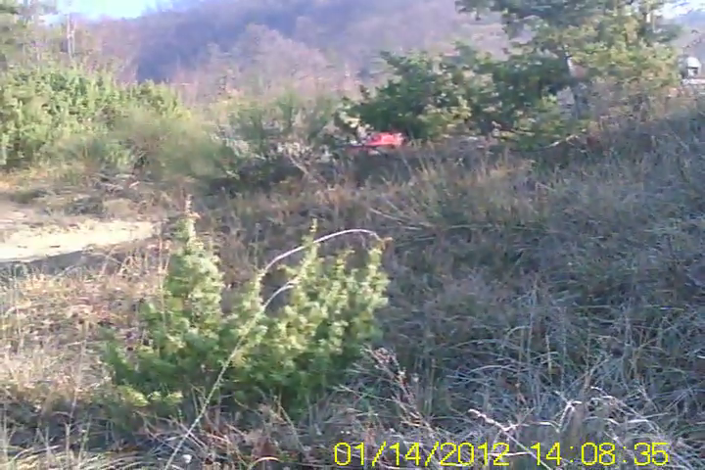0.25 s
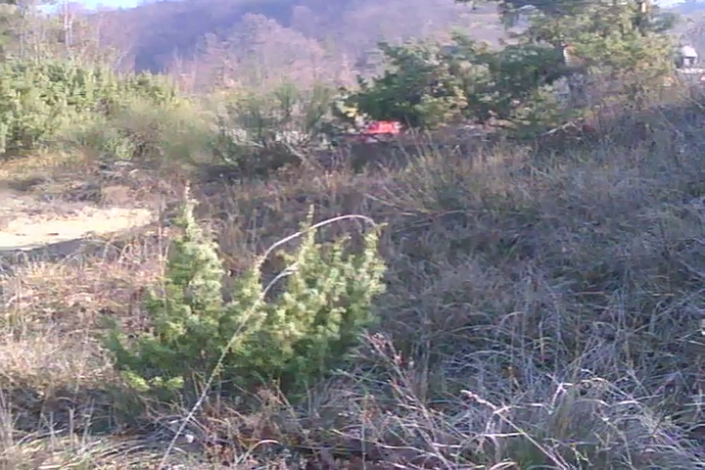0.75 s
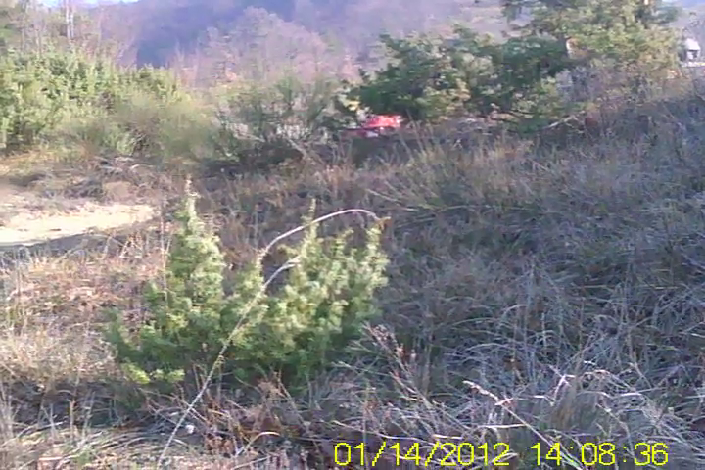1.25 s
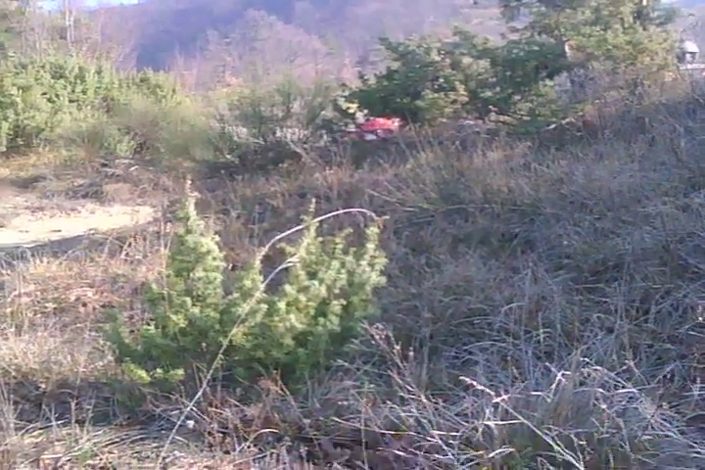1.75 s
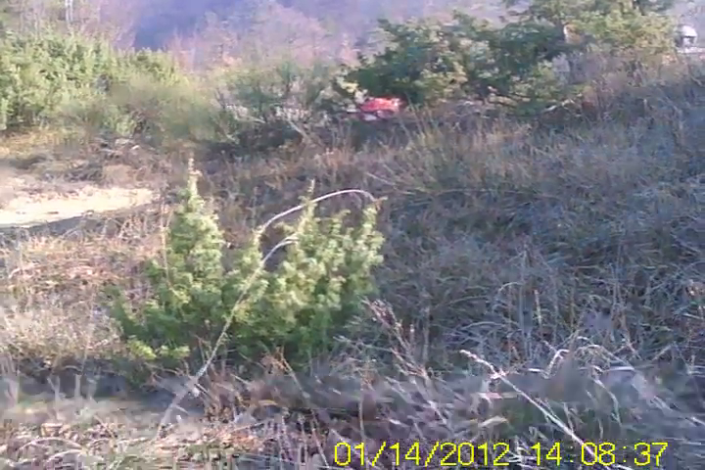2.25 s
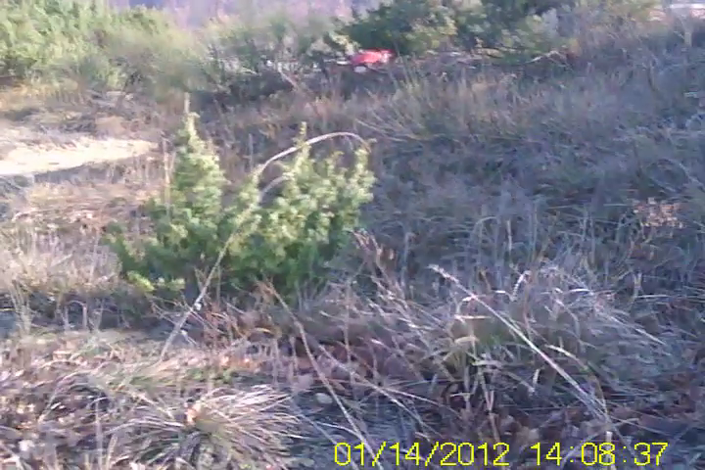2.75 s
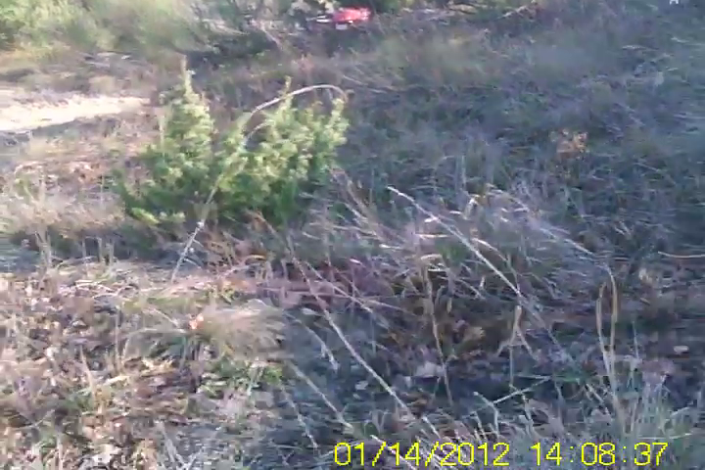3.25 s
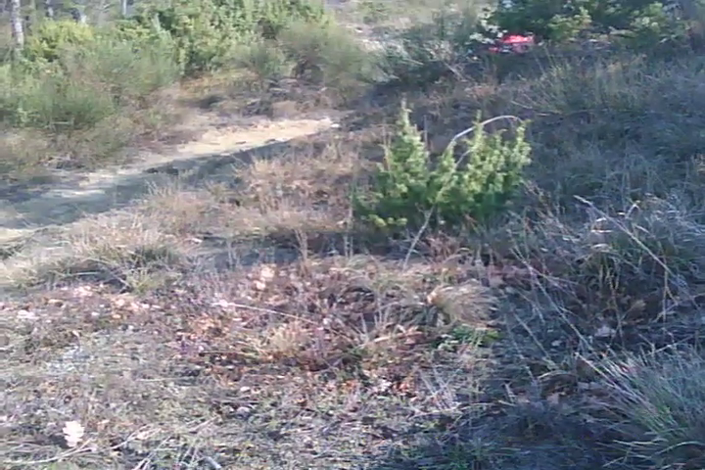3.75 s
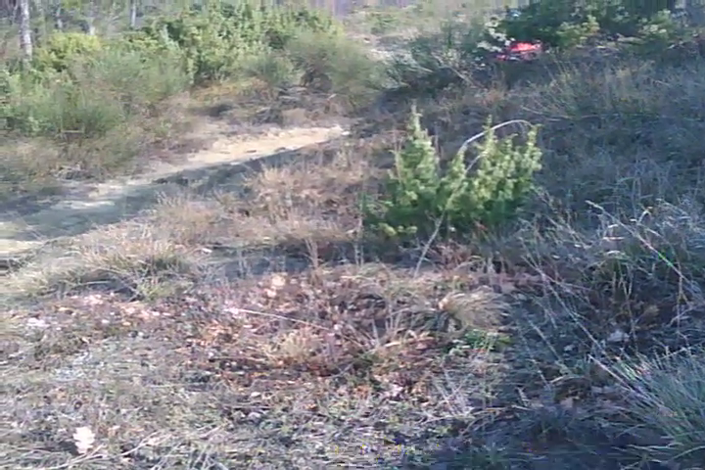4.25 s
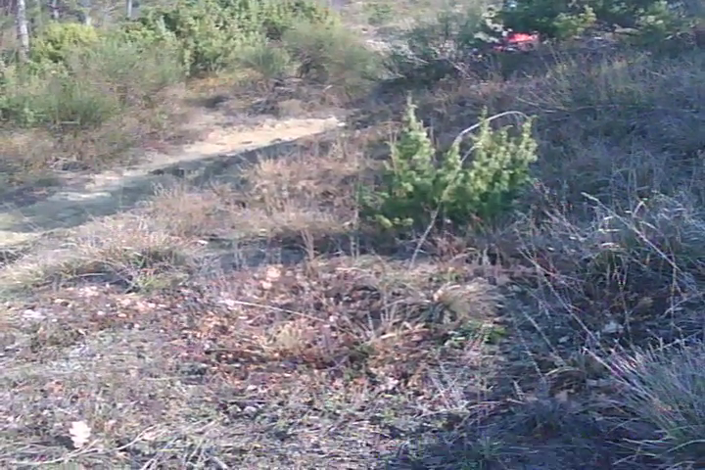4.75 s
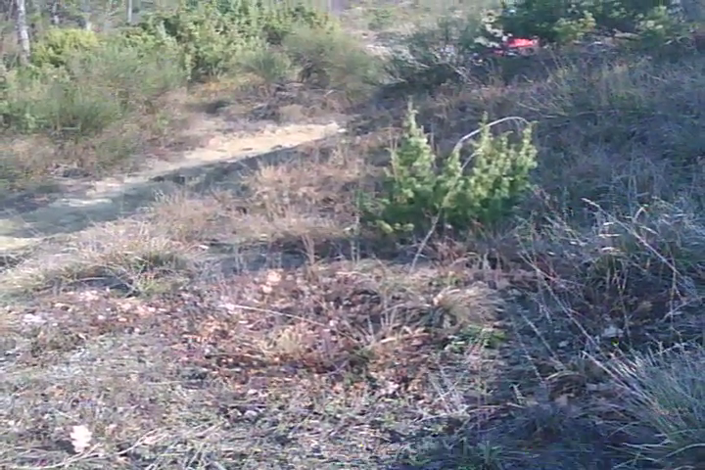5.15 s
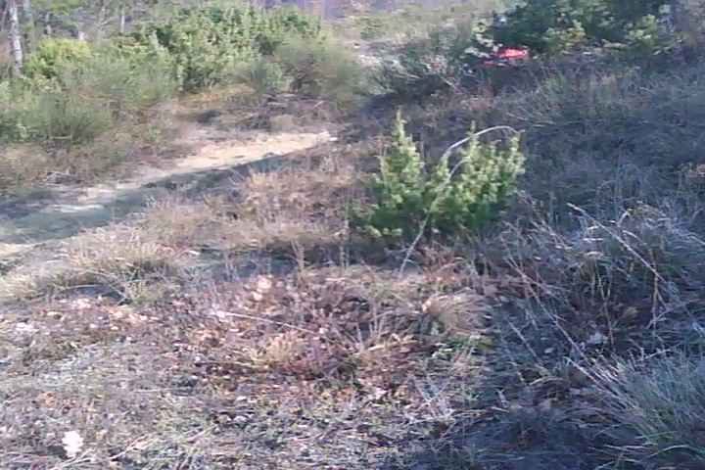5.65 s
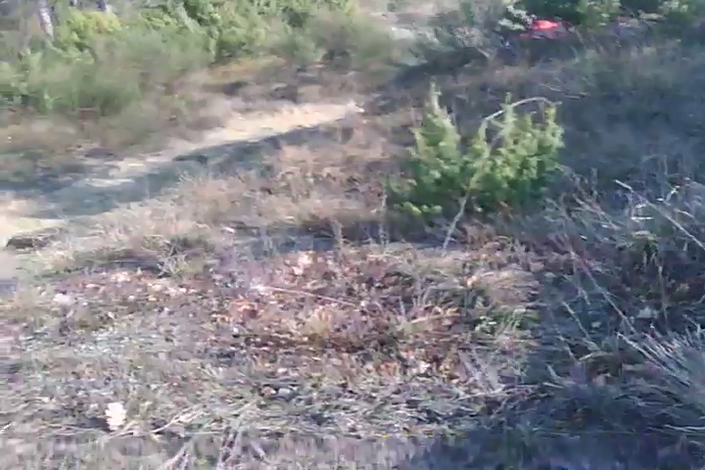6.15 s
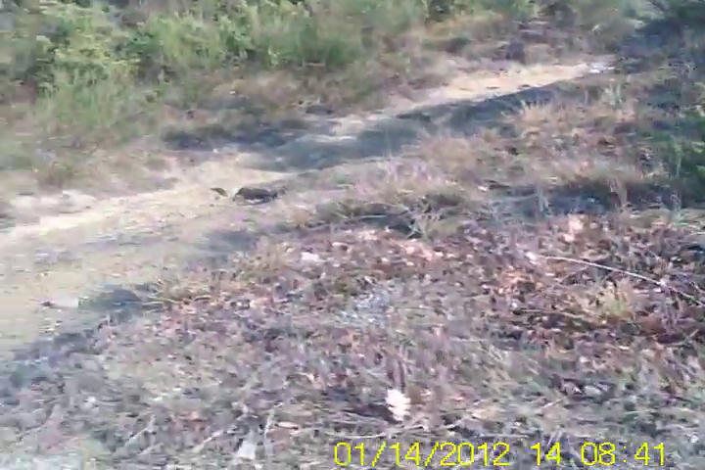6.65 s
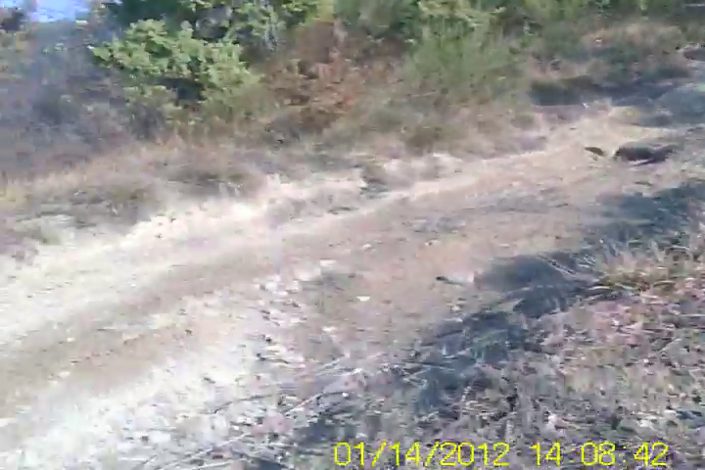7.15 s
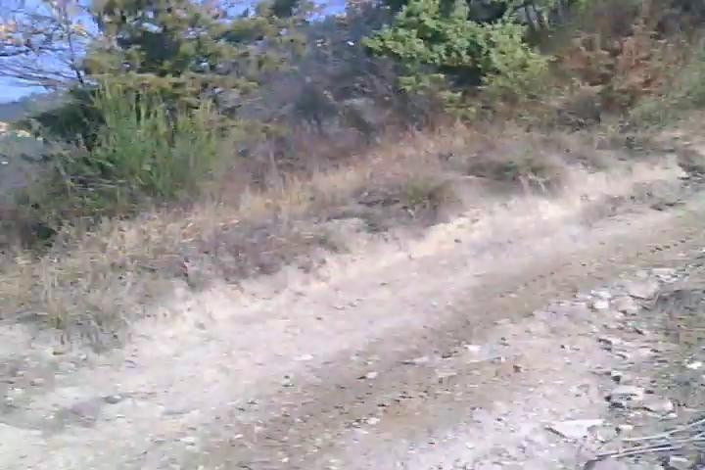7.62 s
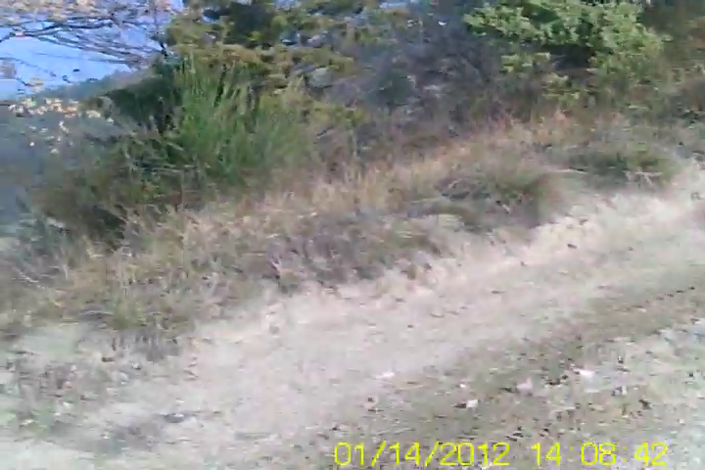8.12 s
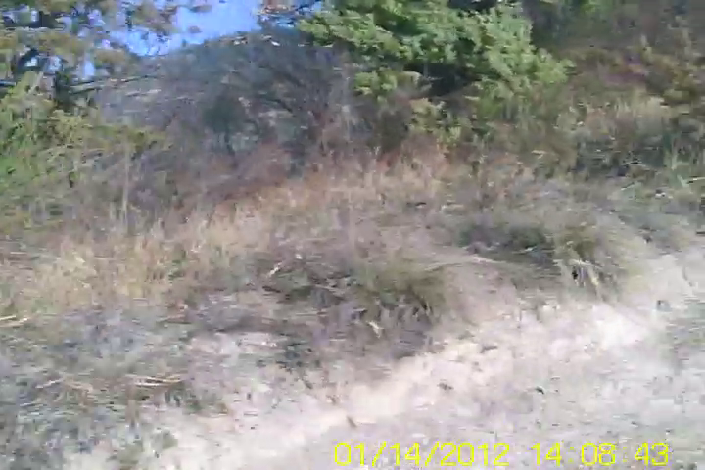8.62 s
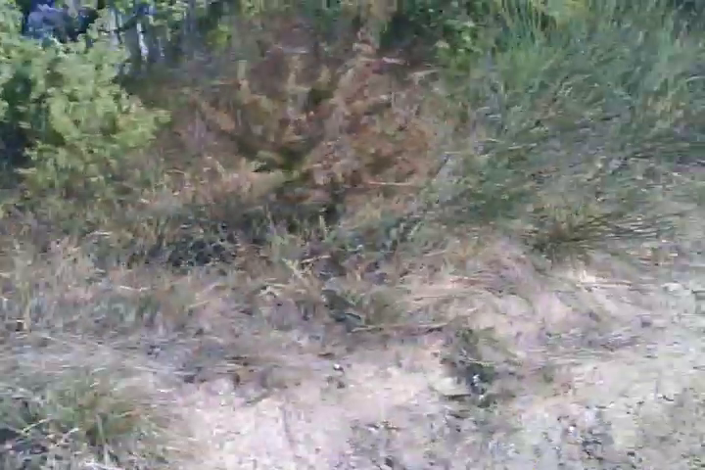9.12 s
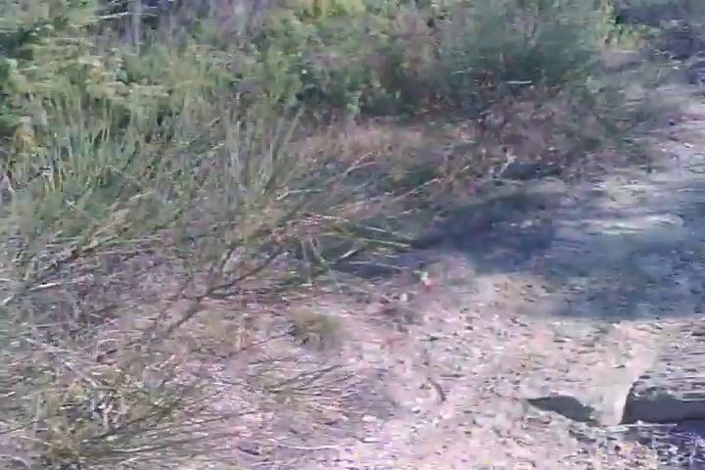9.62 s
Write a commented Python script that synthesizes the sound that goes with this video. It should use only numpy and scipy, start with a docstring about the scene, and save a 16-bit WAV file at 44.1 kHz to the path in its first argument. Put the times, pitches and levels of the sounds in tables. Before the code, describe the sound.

From the rider's seat outdoors on a hillside trail, a single-cylinder quad bike idles in slow soft puffs with light casing clatter. Two hard gear clunks come early, then one short rev with a brief gear whine and drive rattle as it falls. It idles again, knocks lightly, then accelerates into a growling roar with clanking bodywork and rumbling ground, before easing off at the end.

```python
"""A single-cylinder quad bike idles on a rough trail, heard from the rider's seat. It clunks into gear,
is revved once, idles again, then pulls away hard and rolls off. Idle is soft exhaust puffs and intake gulps;
under load sharp pulses ring the silencer, gas rushes out and sine orders of the firing rate swell.
Noise shaken in step with the crank rings the casing and rattles the slack drive; gears whine once.
Knocks ring gearbox and frame, controls tick, bodywork clanks, the ground rumbles; the loudest peaks clip."""
import sys
import numpy as np
from scipy import signal
from scipy.fft import rfft, irfft
from scipy.io import wavfile
from scipy.ndimage import uniform_filter1d

SR = 44100
rng = np.random.default_rng(int(sys.argv[2]) if len(sys.argv) > 2 else 0)


def dump(signal):
    """Clip the signal to [-1, 1] and save it as 16-bit WAV at the path in sys.argv[1]."""
    limited = np.clip(np.atleast_2d(signal).T, -1, 1)
    pcm = np.round(limited * 32767).astype(np.int16)
    wavfile.write(sys.argv[1], SR, pcm)


N = 435708
T = np.arange(N) / SR  # time [s]


def gain_of(db):
    """Decibels to amplitude."""
    return 10 ** (np.asarray(db) / 20)


def evened(x):
    """Scales to rms 1."""
    return x / np.sqrt(np.mean(x ** 2) + 1e-20)


def steadied(x, size):
    """Scales to about rms 1 over a sliding window of samples, leaving faster throbs alone."""
    power = uniform_filter1d(uniform_filter1d(x ** 2, size), size)
    return x / np.sqrt(abs(power) + 1e-12)


def curve(rows):
    """The second column of a table, joined by straight lines in time."""
    times, values = np.transpose(rows)
    return np.interp(T, times, values)


def wander(hz):
    """Slow random motion of rms 1, falling away above the given rate."""
    rolloff = 1 + (np.fft.rfftfreq(N, 1 / SR) / hz) ** 4
    return evened(irfft(rfft(rng.standard_normal(N)) / rolloff, N))


def coloured(x, points):
    """Minimum-phase filter through the given points (frequency [Hz], gain [dB])."""
    hz, db = np.transpose(points)
    bins = abs(np.fft.fftfreq(8192, 1 / SR)) + 1
    log_gain = np.log(gain_of(np.interp(np.log(bins), np.log(hz), db)))
    taps = np.fft.ifft(np.exp(np.conj(signal.hilbert(log_gain)))).real[:4096]
    return signal.oaconvolve(x, taps)[:len(x)]


def ring(x, modes):
    """Parallel resonances (frequency [Hz], width [Hz], level [dB]), each of gain 1 before its level."""
    return sum(gain_of(db) * signal.lfilter(*signal.iirpeak(hz, hz / width, SR), x)
               for hz, width, db in modes)


def lobe(cycle, angle, width):
    """A smooth bump once a cycle; angle and width are shares of the cycle."""
    distance = (cycle - angle + .5) % 1 - .5
    return np.exp(-.5 * (distance / width) ** 2)


def strokes(cycle, angle, scatter, spread_db):
    """One impulse a cycle, a little uneven in timing and strength."""
    turn = np.arange(int(cycle[-1]) + 1)
    shift, strength = rng.standard_normal((len(turn), 2)).T
    at = np.searchsorted(cycle, turn + angle + scatter * shift)
    gain = gain_of(spread_db * np.minimum(strength, 1.5))
    return np.bincount(at, gain * (at > 0), N + 1)[:N]


def impulses(rows):
    """Impulses at the times and levels of an event table."""
    at = [round(row[0] * SR) for row in rows]
    return np.bincount(at, [gain_of(row[1]) for row in rows], N)[:N]


def burst(hits, decay):
    """Each impulse becomes a dying puff of noise of like energy; decay in seconds."""
    r = np.exp(-2 / (decay * SR))
    power = signal.lfilter([1 - r], [1, -r], hits ** 2)
    return np.sqrt(power + 1e-20) * rng.standard_normal(N)


def unit_peak(points):
    """Gain that gives a single click of this colour a peak of 1."""
    return 1 / abs(coloured(signal.unit_impulse(2048), points)).max()


# engine speed; one firing is two turns of the crank: (time [s], firing rate [Hz])
FIRING_RATE = [(0.0, 14.42), (0.27, 15.04), (1.46, 14.59), (2.2, 15.12), (2.6, 22.79), (2.83, 23.98),
               (3.03, 19.43), (3.48, 17.43), (3.7, 15.25), (4.28, 14.54), (5.55, 14.96), (5.74, 21.41),
               (6.11, 30.35), (6.27, 31.26), (6.83, 29.51), (7.16, 27.23), (7.81, 26.75), (8.18, 23.15),
               (8.61, 23.88), (8.91, 25.99), (9.34, 24.91), (9.7, 17.5), (9.88, 16.14)]
IDLE_HZ, FULL_HZ = 15, 30


def revs():
    """Engine speed as a share: 0 at idle, 1 at full speed."""
    return (curve(FIRING_RATE) - IDLE_HZ) / (FULL_HZ - IDLE_HZ)


def push():
    """How fast the revs climb, in shares a second; negative as they fall."""
    return uniform_filter1d(np.gradient(revs()) * SR, size=4400)


INERTIA_S = 0.086  # speeding up takes extra load, as if the engine already ran this much later


def load():
    """Engine load: what holds the speed plus what raises it; 0 at idle, about 1 at full throttle."""
    return np.clip(revs() + INERTIA_S * push(), 0, 1.06)


# until the gear takes up, the free engine thumps and clatters a little more
IN_GEAR_S, NEUTRAL_THUMP_DB, NEUTRAL_CLATTER_DB = 1.39, 3, 1.5


def neutral():
    """1 while the gearbox is in neutral, then 0, with a short ramp between."""
    return np.clip((IN_GEAR_S - T) / 0.11 + .5, 0, 1)


# how hard the quad is jolted by the ground: (time [s], level [dB])
GROUND_JOLTS = [(0, -8), (2.7, -7.5), (5.5, -8.5), (6.2, -2), (6.85, -15.5), (7.3, 1), (8.1, -2.5),
                (8.85, 2), (9.3, -2.5), (9.88, -5)]
RUMBLE_DB = -23  # before the jolts


def rumble():
    """Lumpy low buffeting: dark noise that swells with the jolts of the ground."""
    noise = coloured(rng.standard_normal(N), [(6, -14), (20, 3), (45, 0), (100, -5.5), (200, -11),
                                              (500, -23), (2000, -96.5)])
    return gain_of(RUMBLE_DB + curve(GROUND_JOLTS) + 1.65 * wander(hz=20)) * evened(noise)


# hardest clanks of the bodywork on the rough trail: (time [s], strike level [dB])
BODY_CLANKS = [(6.0243, -10), (6.0632, -2.5), (6.098, -7), (6.4502, -22), (7.0264, -12.5), (7.1359, -3.5),
               (7.2818, -7.5), (7.316, -8), (7.353, -3.5), (7.3895, -11), (7.538, -4.5), (7.6869, -9),
               (7.9163, -8), (8.1714, -2), (8.471, -4.5), (8.742, -4), (8.8688, -4), (9.103, -10.5),
               (9.1338, -19), (9.1782, -6.5), (9.212, -7), (9.302, -4.5)]
# spectrum of a clank: (frequency [Hz], gain [dB])
CLANK_SPECTRUM = [(200, -42), (900, -24), (1600, -1), (2200, -3), (3200, 0.5), (4000, -9), (6000, -5),
                  (8200, -6), (10500, -7), (12500, -30)]


def clanks():
    """The bodywork clanks over bumps: a click and a very short puff of bright noise."""
    hits = impulses(BODY_CLANKS)
    strike = hits + 2.42 * burst(hits, decay=0.0011)
    return gain_of(-2.5) * unit_peak(CLANK_SPECTRUM) * coloured(strike, CLANK_SPECTRUM)


# small ticks of the controls and of grit under the tyres: (time [s], strike level [dB])
SMALL_TICKS = [(1.343, -34), (1.601, -39), (2.221, -41), (2.273, -33), (3.7254, -28.5), (3.9968, -34),
               (4.2138, -36), (4.6379, -39), (4.9302, -40), (5.54, -37)]


def ticks():
    """Controls and grit tick as short bright puffs; each knock gets such a treble edge too."""
    edges = impulses([(s, db + lift_db - 32.5) for s, db, lift_db in GEAR_KNOCKS])
    puffs = 4.1 * burst(impulses(SMALL_TICKS) + edges, decay=0.0081)
    return unit_peak(RATTLE_SPECTRUM) * coloured(puffs, RATTLE_SPECTRUM)


# resonances of the frame under a clunk: (frequency [Hz], width [Hz], level [dB])
FRAME_MODES = [(120, 52, 7), (252, 50, -3), (410, 92, -16), (634, 28, -4), (1170, 130, -10),
               (1440, 88, -13)]
FRAME_DB = -3.5


def frame():
    """Each clunk is a blunt blow that sets the frame ringing briefly."""
    blunt = signal.butter(2, 2000, fs=SR, output="sos")
    blows = signal.sosfilt(blunt, -impulses(GEAR_KNOCKS))
    peak = abs(ring(signal.unit_impulse(2048), FRAME_MODES)).max()
    return gain_of(FRAME_DB) / peak * ring(blows, FRAME_MODES)


# gear clunks and chassis knocks: (time [s], strike level [dB], treble lift [dB])
GEAR_KNOCKS = [(1.1778, -4.5, 8.5), (1.2948, -1.5, 6), (1.348, -19, 0), (4.649, -10, 9), (4.725, -12.5, -9),
               (4.749, -16, -12)]
# spectrum of a clunk: (frequency [Hz], gain [dB])
CLUNK_SPECTRUM = [(20, -85), (70, -3), (180, 10.5), (450, 18), (800, 9), (1500, 7), (2600, -7), (4500, -19),
                  (9000, -25), (12500, -54)]


def clunks():
    """The gearbox clunks and rebounds: an opposite, weaker blow follows each one."""
    blows = impulses(GEAR_KNOCKS)
    blows = blows - .5 * np.roll(blows, round(0.00585 * SR))
    strike = 0.61 * blows + 0.64 * burst(blows, decay=0.0085)
    return unit_peak(CLUNK_SPECTRUM) * coloured(strike, CLUNK_SPECTRUM)


# the gears sing once as the throttle snaps shut
WHINE_S, WHINE_LENGTH_S, WHINE_DB = 2.8, .32, -38


def whine(cycle):
    """Two pairs of gear teeth mesh at fixed multiples of the engine speed."""
    mesh = sum(np.cos(2 * np.pi * teeth * cycle + .8 * wander(hz=40)) for teeth in (49.5, 61))
    age = np.clip((T - WHINE_S) / WHINE_LENGTH_S, 0, 1)
    swell = np.sqrt(4 * age * (1 - age))
    return gain_of(WHINE_DB) * swell * mesh


# chuffs of valve gear and piston in each cycle; a row of width 0 is silent:
# (angle [cycle], width [cycle], frequency [Hz], resonance width [Hz], level [dB])
CASING_CHUFFS = [(0.44, .05, 4040, 550, -55), (0.89, .05, 1582, 330, -46.5), (0.38, 0, 2090, 200, -48)]


def chuffs(cycle):
    """Valve gear and piston take turns to shake their own parts of the casing."""
    out = 0
    for angle, width, hz, width_hz, db in CASING_CHUFFS:
        mode = [(hz, width_hz, 0)]
        puffs = lobe(cycle, angle, width) * rng.standard_normal(N)
        out = out + gain_of(db) * evened(ring(ring(puffs, mode), mode))
    return out * gain_of(NEUTRAL_CLATTER_DB * neutral())


# ringing modes of the engine casing: (frequency [Hz], width [Hz], level [dB])
CASING_MODES = [(836, 32, 5), (1020, 46, 1.5), (1098, 42, 5), (1497, 13.6, 10.5), (1565, 63, 9.5),
                (1646, 21, 8), (1880, 130, -27), (2059, 64, 8.5), (2590, 31, -8), (2970, 30, -16),
                (3266, 73, -6.5), (3636, 120, -6), (4015, 67, -5)]
# spectrum of the casing's noise wash: (frequency [Hz], gain [dB])
CASING_WASH = [(100, -27), (400, 1), (700, -9.5), (1280, -9.5), (1900, -5.5), (2500, -23), (4300, -24),
               (4900, -33), (6000, -25), (6900, -33), (8100, -25), (10000, -38.5), (12000, -56)]
# valve gear and casing: base level at idle in gear, rise to full speed and to full load
CLATTER_DB, CLATTER_SPEED_DB, CLATTER_LOAD_DB = -37, 6.5, 4.5


def clatter(cycle):
    """Combustion and piston slap shake the casing once each turn; the valves tick as they seat."""
    shake = .5 + 0.87 * lobe(cycle, angle=0.84, width=0.079)
    shake = shake + 1.14 * lobe(cycle, angle=0.349, width=0.024) + 0.55 * lobe(cycle, angle=0.051, width=0.14)
    taps = strokes(cycle, angle=.85, scatter=.012, spread_db=-4.5)
    taps = taps + 1.27 * strokes(cycle, angle=.44, scatter=.02, spread_db=14.0)
    drive = evened(shake * rng.standard_normal(N)) + 0.21 * evened(burst(taps, decay=0.0022))
    drive = coloured(drive, [(200, -19), (700, 2), (4200, 1.5), (5000, -17.5), (9000, -17), (12000, -83)])
    ringing = gain_of(-.5) * evened(ring(drive, CASING_MODES))
    wash = gain_of(-3.0) * evened(coloured(shake ** 0.25 * rng.standard_normal(N), CASING_WASH))
    level = CLATTER_DB + CLATTER_SPEED_DB * revs() + CLATTER_LOAD_DB * load()
    return gain_of(level + NEUTRAL_CLATTER_DB * neutral()) * (ringing + wash)


# the slack drive snatches as the load comes and goes: (time [s], half length [s], level [dB])
DRIVE_SNATCHES = [(2.999, 0.03, -34), (3.056, 0.018, -34.5), (3.152, 0.035, -36.5), (3.36, 0.047, -25.5),
                  (3.496, 0.058, -41.5), (5.6, .025, -40), (9.585, 0.036, -27.5), (9.712, 0.029, -30.5)]
# drive rattle: level at full load before the jolts, growth with load, share of the jolts, starting speed
RATTLE_DB, RATTLE_POWER, RATTLE_JOLT, RATTLE_FROM_HZ = -21.5, 0.91, 0.47, 18


def rattle_strength():
    """The drive rattles once it is turning, harder with load and jolts, and in brief snatches."""
    turning = np.clip((curve(FIRING_RATE) - RATTLE_FROM_HZ) / 1.62, 0, 1)
    steady = turning * load() ** RATTLE_POWER * gain_of(RATTLE_DB + RATTLE_JOLT * curve(GROUND_JOLTS))
    snatches = sum(gain_of(db) * np.exp(-((T - s) / half) ** 2) for s, half, db in DRIVE_SNATCHES)
    return (steady + snatches) * gain_of(1.7 * wander(hz=15.5))


# spectrum of the rattling drive, shared by the small ticks: (frequency [Hz], gain [dB])
RATTLE_SPECTRUM = [(300, -15.5), (1500, 1), (2600, -3.5), (3400, 6), (3950, -1.5), (4700, 5), (5450, -5.5),
                   (6050, 1), (6700, -4), (8000, 2), (9100, -9.5), (10300, -17), (11400, -28), (12600, -66)]


def rattle(cycle):
    """Slack in the drive slaps near each quarter of the cycle; at speed one leads, with bounces between."""
    fast = np.clip((curve(FIRING_RATE) - 21) / 8, .15, 1)
    quarters = [(.10, 6.5), (.345, 3.5), (.595, -2), (.845, 11.5)]  # (angle [cycle], level [dB])
    bounces = [(.225, -24), (.49, -47), (.73, 6.5), (.94, -13)]  # (angle [cycle], level [dB])
    slaps = sum(gain_of(db * np.sqrt(fast)) * strokes(cycle, angle, scatter=.004, spread_db=3)
                for angle, db in quarters)
    slaps = slaps + fast * sum(gain_of(db) * strokes(cycle, angle, scatter=.01, spread_db=4)
                               for angle, db in bounces)
    crack = slaps + .4 * burst(slaps, decay=.0007)
    # the housing rings on briefly after each slap
    housing = ring(burst(slaps, decay=0.0016), [(3570, 390, -3.0), (4240, 67, -34), (2600, 610, -33),
                                                (6000, 7400, -8)])
    sound = coloured(crack + housing, RATTLE_SPECTRUM)
    return rattle_strength() * steadied(sound, size=2000)


# low orders: (multiple of the firing rate, level at full speed before the airbox [dB], slope [dB/octave])
DRONE_ORDERS = [(1, -22, 30), (2, -23.5, 3), (3, -31.5, -3), (4, -22, 3), (5, -22.5, 11), (6, -41.5, -21.5),
                (7, -35.5, 12.5)]
# the airbox booms as the orders sweep through it: (frequency [Hz], gain [dB])
AIRBOX_RESPONSE = [(30, -3.5), (62, -5), (76, 1), (94, -5.5), (108, -5.5), (122, 1.5), (155, 0), (190, 4),
                   (220, -7)]


def drone(cycle):
    """Clean low orders of the firing rate swell above idle and boom as they cross the airbox resonances."""
    speed, above_idle = curve(FIRING_RATE), np.clip((revs() - .03) / 0.11, 0, 1)
    out = 0
    for k, db, octave_db in DRONE_ORDERS:
        order = round(k)
        airbox_db = np.interp(order * speed, *np.transpose(AIRBOX_RESPONSE))
        level = db + octave_db * np.log2(speed / FULL_HZ) + airbox_db
        offset = (order - 1) / len(DRONE_ORDERS) / 2  # staggers the orders within the cycle
        out = out + gain_of(level + 1.0 * wander(hz=1.5)) * np.cos(2 * np.pi * order * (cycle - offset))
    return np.sqrt(2) * above_idle * out


# clean upper overtones of the exhaust note at full load: (frequency [Hz], level [dB])
EXHAUST_OVERTONES = [(370, -65), (430, -43), (570, -38), (700, -45), (830, -43), (1100, -46), (1300, -54)]
OVERTONE_POWER = 2.87  # how steeply they grow with load


def overtones(cycle):
    """The steady exhaust note: clean multiples of the firing rate that glide with the revs."""
    speed, out = curve(FIRING_RATE), 0
    for order in range(13, 42):
        spread = order ** 2 * np.sqrt(2)  # the pipe smears each pulse over the whole cycle
        level = np.interp(order * speed, *np.transpose(EXHAUST_OVERTONES))
        out = out + gain_of(level) * np.cos(2 * np.pi * (order * cycle + spread))
    return np.sqrt(2) * load() ** OVERTONE_POWER * out


# spectrum of the turbulence in the soft thump: (frequency [Hz], gain [dB])
THUMP_SPECTRUM = [(10, -43), (28, -11), (45, -32), (75, -5), (122, 6.5), (140, 2.5), (165, -7), (212, -12),
                  (280, 3), (345, -12.5), (430, -8), (600, -17), (1200, -26), (3000, -82)]
# soft exhaust thump: base level in gear, lift when speeding up, and its fading from a speed upward
THUMP_DB, THUMP_PUSH_DB, THUMP_FADE_HZ, THUMP_FADE_DB_PER_HZ = -22, 3.5, 17.1, 1.06


def thump(cycle):
    """The exhaust valve lets out one soft puff a cycle, and the intake gulps after it; fades with speed."""
    puff = lobe(cycle, angle=.13, width=.024)
    gulp = lobe(cycle, angle=.351, width=.022)
    exhaust = ring(puff, [(127.6, 34.8, 0.5), (245, 58, 2), (278.2, 4.5, 9.5)]) - ring(puff, [(146, 240, -7.0)])
    intake = ring(gulp, [(59.6, 10.7, -10.5)]) - ring(gulp, [(44.2, 37.0, -10.5)])
    chuff = ring(strokes(cycle, angle=0.26, scatter=0.01, spread_db=5.0),
                 [(197, 13, -21), (309, 42, 1.5), (406, 28, -5), (584, 43, -11.0)])
    chuff = signal.sosfilt(signal.butter(4, 800, fs=SR, output="sos"), chuff)
    swirl = coloured(lobe(cycle, angle=0.26, width=0.23) * rng.standard_normal(N), THUMP_SPECTRUM)
    gas = evened(exhaust + intake) + gain_of(-18) * evened(chuff) + gain_of(-13) * evened(swirl)
    fade = THUMP_FADE_DB_PER_HZ * np.maximum(curve(FIRING_RATE) - THUMP_FADE_HZ, 0)
    level = THUMP_DB + NEUTRAL_THUMP_DB * neutral() + THUMP_PUSH_DB * np.tanh(push() / .5) - fade
    return gain_of(level + 0.46 * wander(hz=24)) * gas


# resonances of the silencer under load: (frequency [Hz], width [Hz], level [dB])
SILENCER_MODES = [(241, 16, 10), (280, 24, -3), (313, 22, 3), (370, 32, 1.5), (495, 30, -11),
                  (560, 30, -12), (620, 36, -9.5), (715, 35, -16), (817, 17, -3.5), (930, 40, -20),
                  (1020, 40, -21)]
# spectrum of the rushing exhaust gas: (frequency [Hz], gain [dB])
GAS_SPECTRUM = [(60, -36), (180, -3), (330, 5), (450, -7), (700, -12.5), (1050, -12), (1400, -13.5),
                (2400, -9), (3400, -16), (4800, -31), (9000, -45), (12000, -63)]
# overall level of boom and gas, and how steeply each grows with load
ROAR_DB, ROAR_POWER, RUSH_POWER = -23, 1, 1.03


def roar(cycle):
    """Hard, regular exhaust pulses ring the silencer; turbulent gas rushes out with each one."""
    pulses = strokes(cycle, angle=.17, scatter=.001, spread_db=.6)
    # each resonance answers after its own trip through the chambers, which fuses the pulses into a growl
    delays = np.arange(len(SILENCER_MODES)) * .0113 % .03  # seconds
    pipe = sum(np.roll(ring(pulses, [mode]), round(delay * SR)) for mode, delay in zip(SILENCER_MODES, delays))
    pipe = coloured(pipe, [(90, -30), (170, -16), (225, 0), (400, 0), (600, -2), (1000, -2), (1500, -14),
                           (5000, -55), (12000, -90)])
    flow = 0.098 + lobe(cycle, angle=0.16, width=0.021) + .5 * lobe(cycle, angle=.92, width=.12)
    rush = coloured(flow * rng.standard_normal(N), GAS_SPECTRUM)
    boom = gain_of(3.0) * load() ** ROAR_POWER * steadied(pipe, size=6000)
    gas = gain_of(-6.5) * load() ** RUSH_POWER * evened(rush)
    return gain_of(ROAR_DB) * (boom + gas)


def scene():
    """Every engine sound follows the same crank angle; ground and knocks keep their own times."""
    cycle = np.cumsum(curve(FIRING_RATE)) / SR
    surroundings = rumble() + clanks() + ticks() + frame() + clunks()
    mechanics = whine(cycle) + chuffs(cycle) + clatter(cycle) + rattle(cycle)
    exhaust = drone(cycle) + overtones(cycle) + thump(cycle) + roar(cycle)
    return (surroundings + mechanics + exhaust)[None]


EDGE_HZ = 16300  # upper band limit


def record(dry):
    """The sharpest peaks overload and clip; then a steep low-pass limits the band."""
    clipped = np.clip(dry, -.72, .72)
    lowpass = signal.firwin(511, EDGE_HZ, window=("kaiser", 9), fs=SR)
    return signal.oaconvolve(clipped, lowpass[None], "same")


dry = scene()
out = record(dry)
dump(out)
```